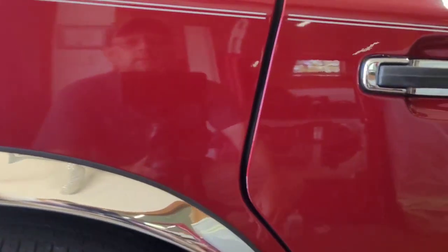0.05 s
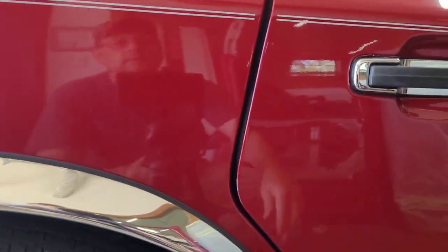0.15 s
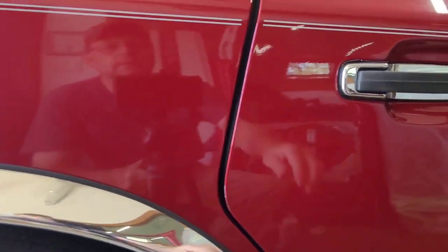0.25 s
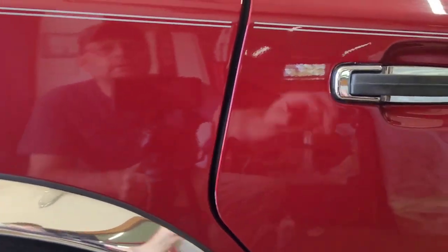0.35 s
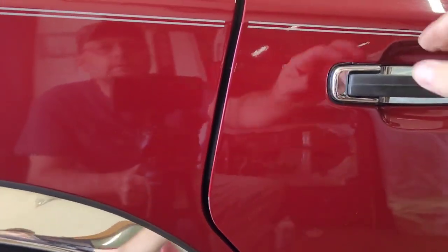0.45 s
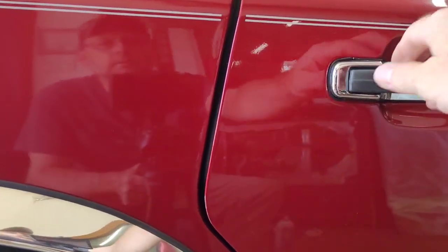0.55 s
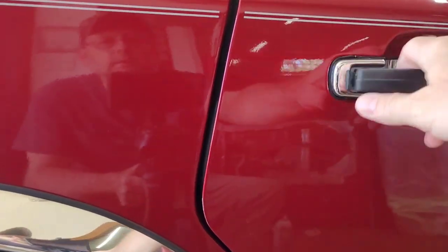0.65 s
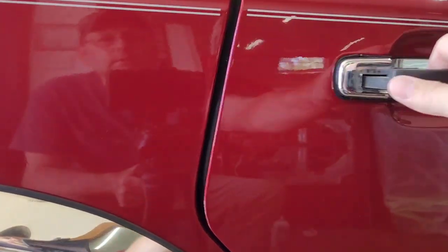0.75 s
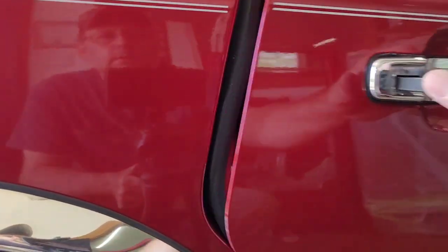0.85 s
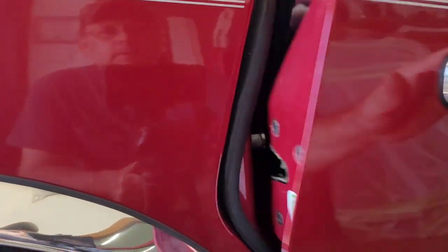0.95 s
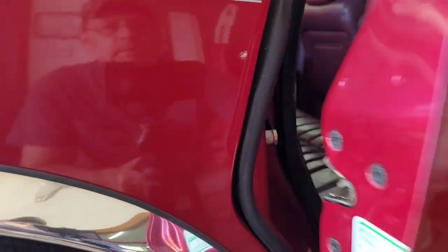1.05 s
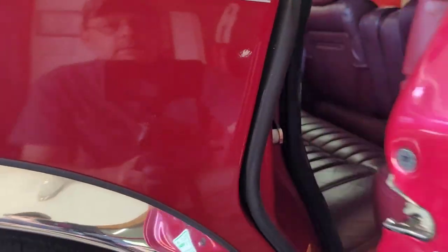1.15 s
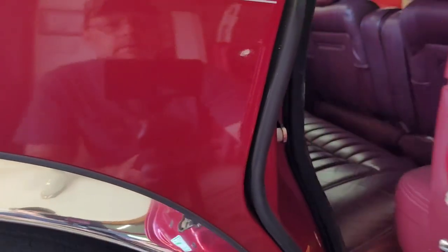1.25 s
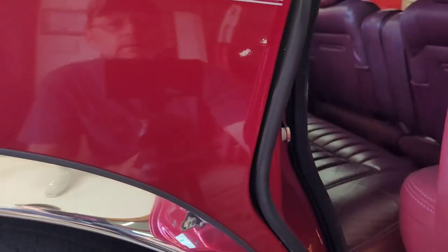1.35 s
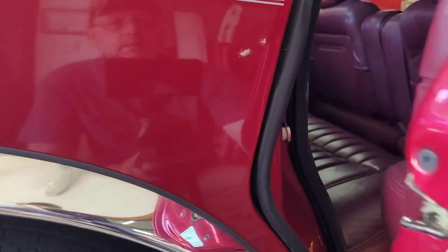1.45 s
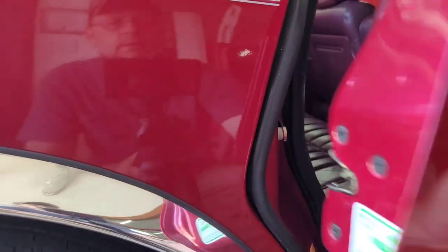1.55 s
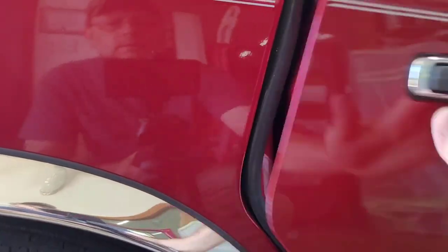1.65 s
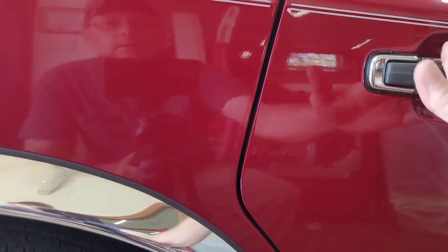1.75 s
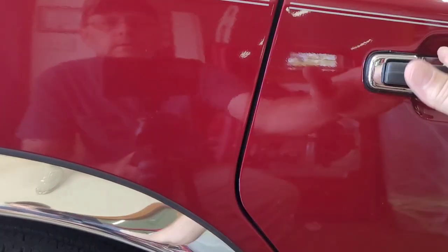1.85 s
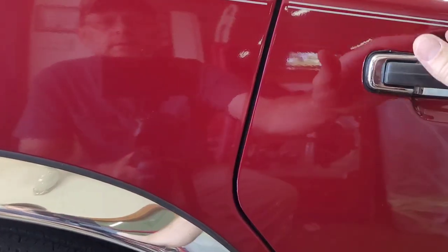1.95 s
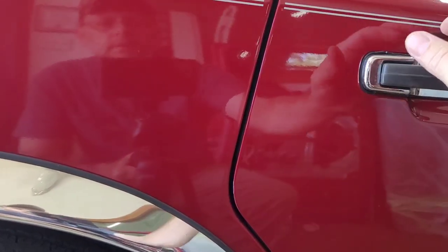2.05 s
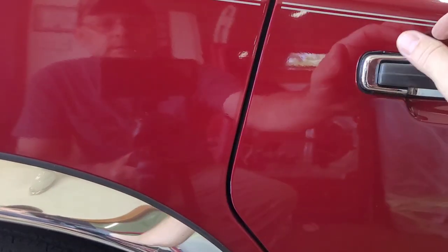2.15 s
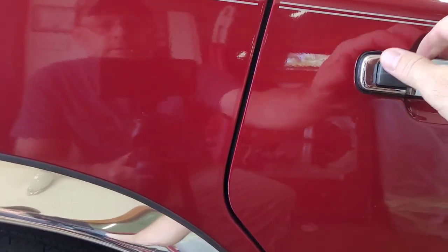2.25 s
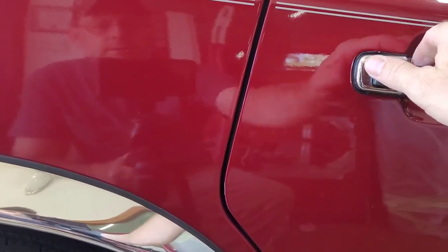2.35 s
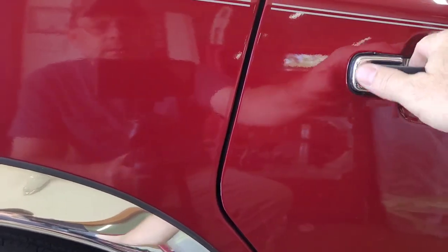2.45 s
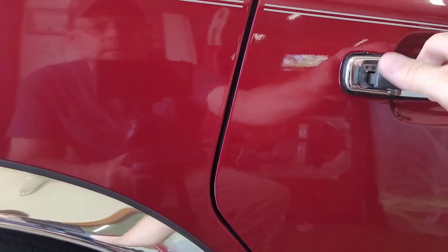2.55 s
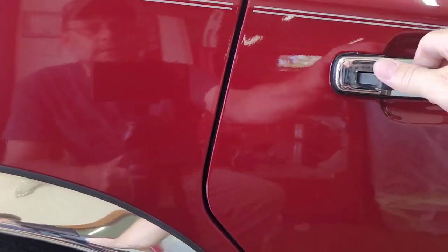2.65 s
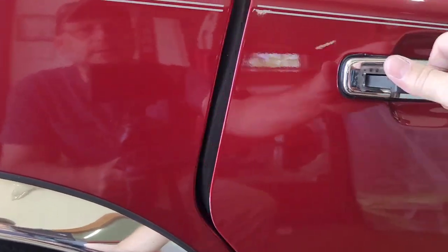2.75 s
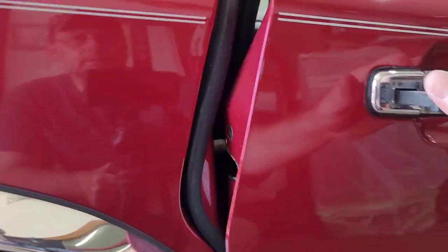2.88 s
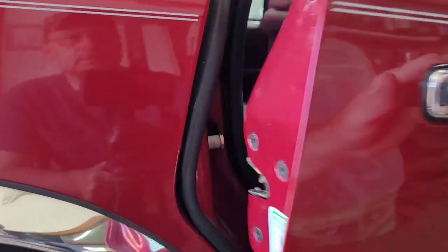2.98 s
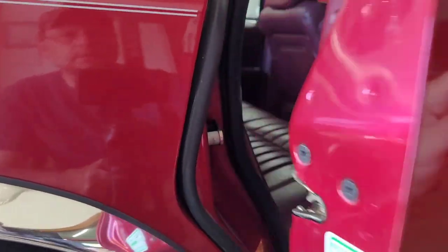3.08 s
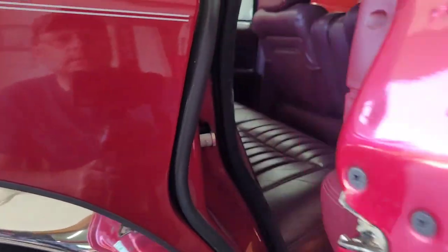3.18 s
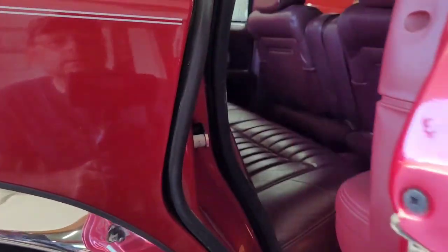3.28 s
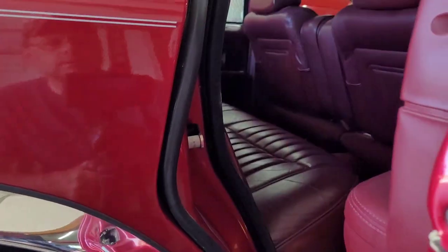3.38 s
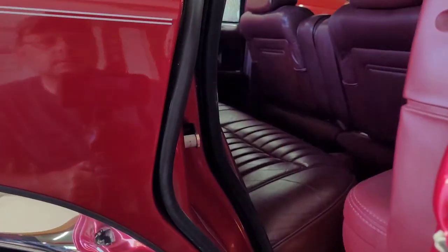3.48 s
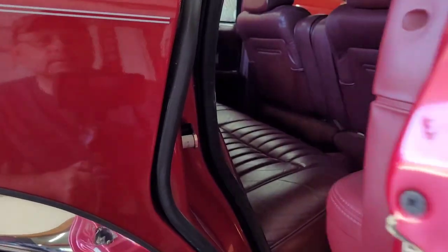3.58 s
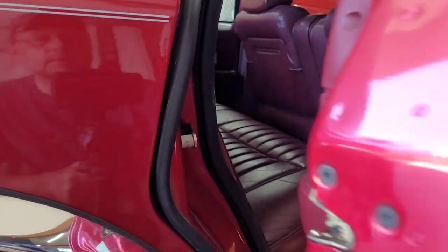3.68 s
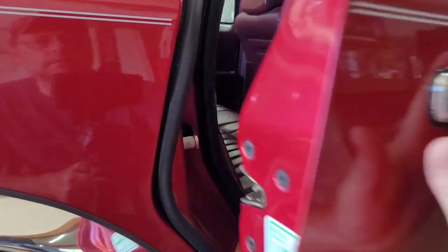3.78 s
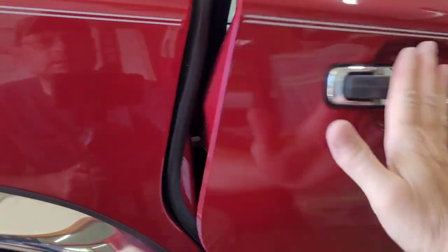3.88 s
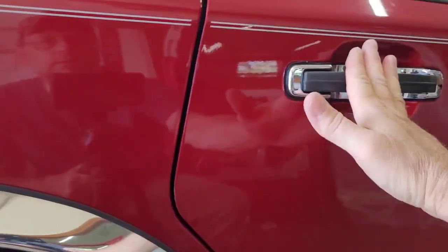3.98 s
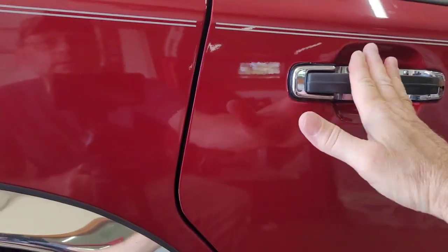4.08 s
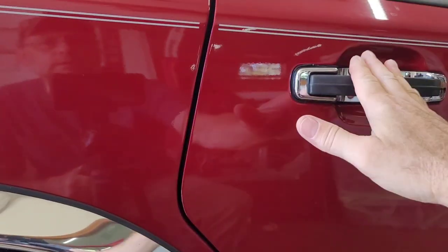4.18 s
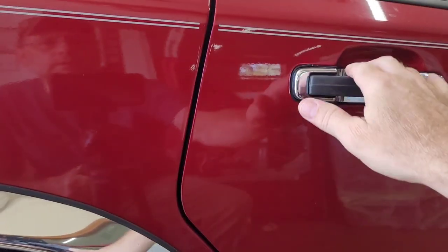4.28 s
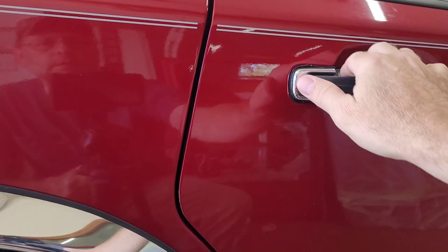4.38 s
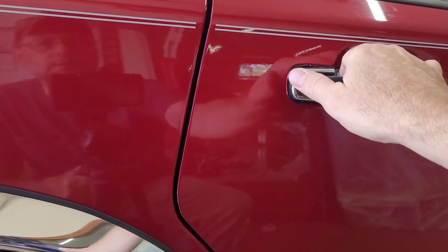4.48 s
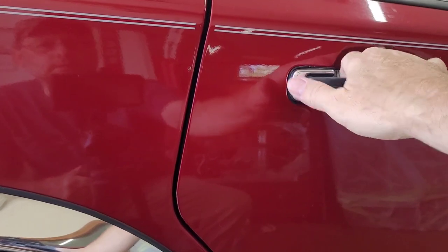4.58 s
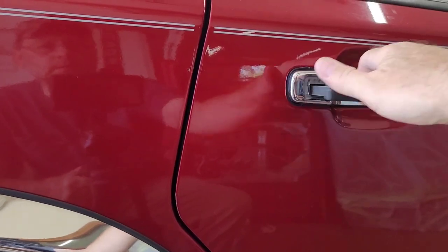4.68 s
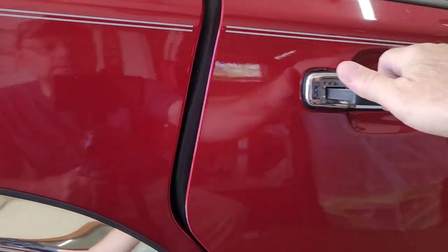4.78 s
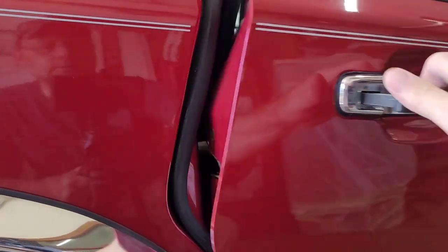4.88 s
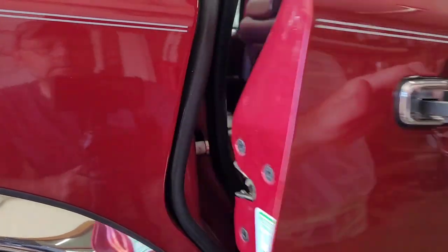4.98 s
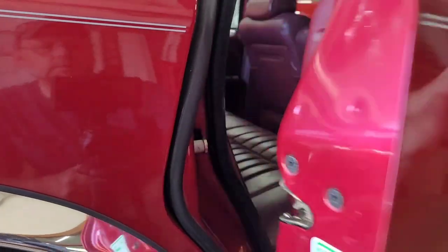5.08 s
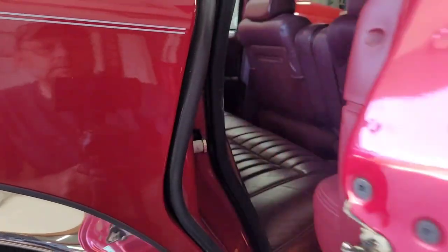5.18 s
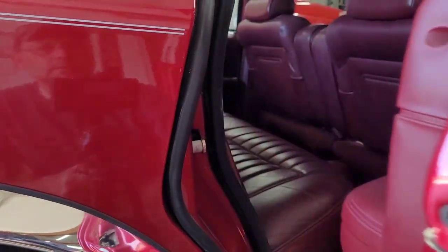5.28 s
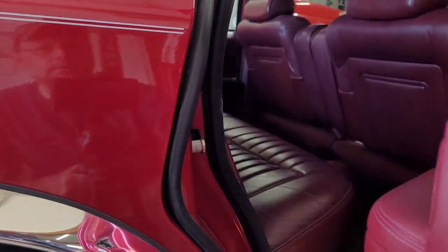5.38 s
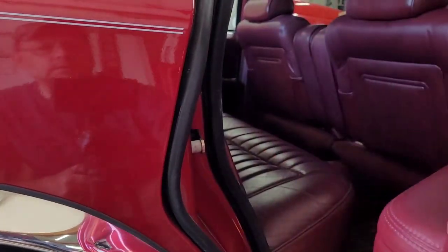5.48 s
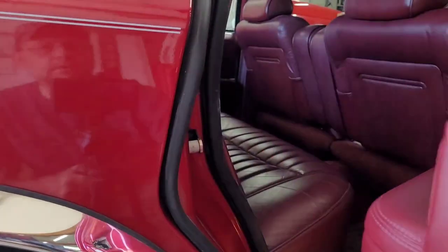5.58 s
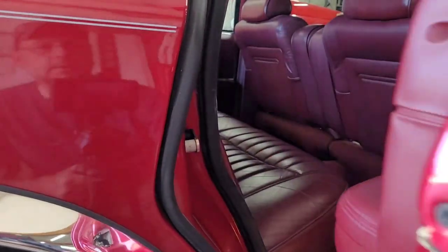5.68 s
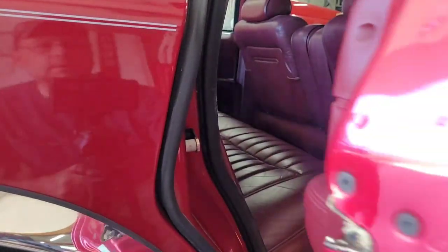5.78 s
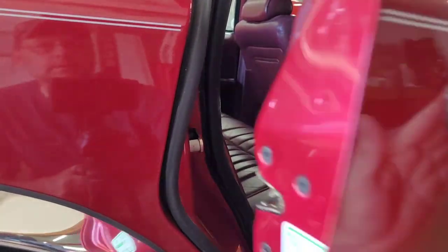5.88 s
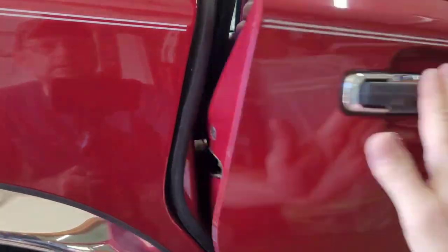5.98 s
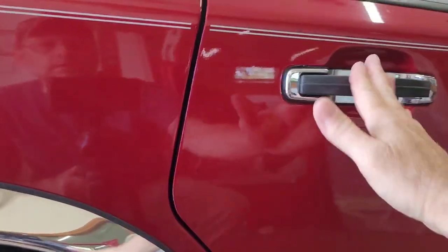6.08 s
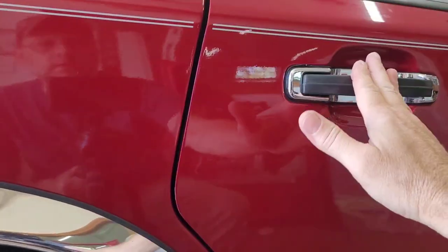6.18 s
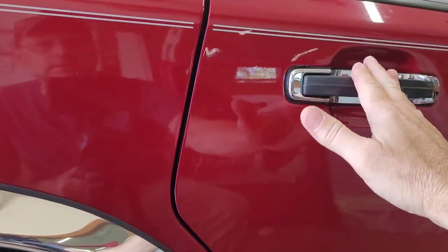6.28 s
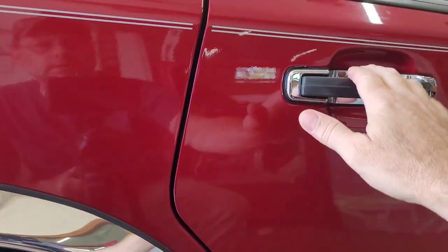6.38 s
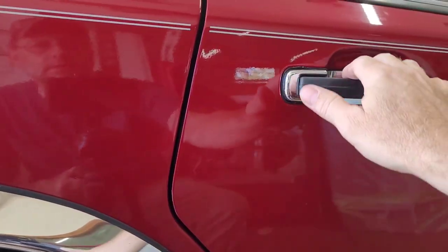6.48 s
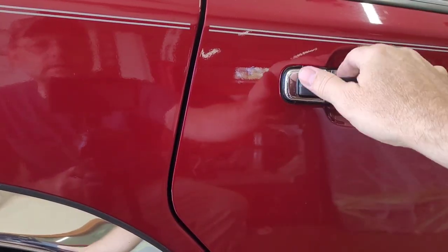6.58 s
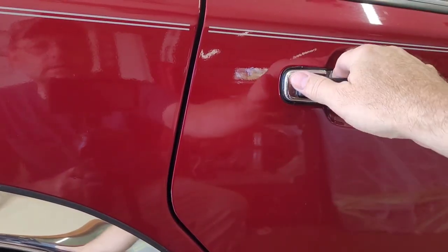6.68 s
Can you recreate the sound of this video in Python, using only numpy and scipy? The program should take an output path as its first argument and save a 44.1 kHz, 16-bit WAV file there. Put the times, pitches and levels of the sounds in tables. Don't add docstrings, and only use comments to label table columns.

```python
import sys
import numpy as np
from scipy import signal
from scipy.fft import rfft, irfft, next_fast_len
from scipy.io import wavfile
from scipy.ndimage import uniform_filter1d

SR = 44100
rng = np.random.default_rng(int(sys.argv[2]) if len(sys.argv) > 2 else 0)


def store_wav(level_fs):
    pcm = np.round(np.clip(np.atleast_2d(level_fs), -1, 1) * 32767)
    wavfile.write(sys.argv[1], SR, pcm.T.astype(np.int16))


def invert_db(level):
    return 10 ** (np.asarray(level, dtype=float) / 20)


N = 296953
LEAD_IN = 11025
CLICK_SIZE = SR // 6

# first_catch_s, first_catch_db, gap_to_full_catch_s, full_catch_db, thud_db
DOOR_SHUTS = [
    (-.18, -6.5, 0.019, -4.5, -2),
    (1.7387, -5, 0.015, -7.5, -9),
    (3.9936, -8.5, .0155, -6.5, -8),
    (6.111, -8.5, 0.016, -7, -8),
]
# spring_release_s, spring_db, gap_to_knock_s, knock_db, door_skin_db
HANDLE_SNAPS = [
    (1.0947, -12.5, 0.008, -4, -8),
    (3.1, -15.5, .0122, -5, -11.5),
    (5.1243, -17.5, .0108, -5.5, -13.5),
]
# start_s, link_db, spring_db, struck_rod_hz
HANDLE_CLICKS = [(0.248, -46.5, -51, 1390), (0.501, -54.5, -71, 2210), (0.718, -22.5, -52, 850),
                 (0.748, -28, -51, 1280), (0.781, -21.5, -38.5, 727), (0.793, -13, -26.5, 2060),
                 (0.809, -18, -21.5, 1330), (0.856, -30, -23.5, 705), (0.953, -52, -39.5, 972),
                 (1.066, -52.5, -49.5, 1000), (2.574, -27, -67, 834), (2.588, -29.5, -42.5, 845),
                 (2.626, -40.5, -63, 856), (2.709, -30.5, -43.5, 727), (2.770, -32, -57, 1300),
                 (2.802, -29, -23.5, 705), (3.054, -55.5, -68, 900), (3.080, -53, -50.5, 900),
                 (4.67, -25.5, -67.5, 821), (4.686, -31, -40.5, 727), (4.747, -42.5, -51.5, 900),
                 (4.7586, -18.5, -16.5, 705), (4.799, -28, -38.5, 716), (4.827, -25.5, -23.5, 1870)]
# center_s, peak_db, pitch_hz, length_cycles
SOFT_KNOCKS = [(.27, -56, 60.1, 0.76), (0.531, -63, 67.9, 2.1), (0.529, -64, 154.8, 6.),
               (.33, -62.5, 160, 6.), (1.381, -44.5, 52.47, 2.4), (1.49, -46.5, 80.9, 1.6),
               (2.35, -68, 55, 4.6), (2.502, -65, 55, 1.77), (2.713, -35, 150, 1.4),
               (2.752, -54.5, 4320, 61), (3.31, -45.5, 90, 1.4), (3.39, -47, 268, 4.1),
               (3.728, -60.5, 69.3, 1.9), (3.77, -61, 59.6, 2.1), (4.432, -56, 55.1, 4.8),
               (4.6, -63.5, 54.8, 3.4), (4.7477, -26, 133.5, 1.3), (5.43, -54, 517, 2.3),
               (3.375, -58, 516, 4.), (5.444, -44.5, 261, 3.9), (5.787, -56, 53.1, 1.61),
               (6.68, -67, 50, 3)]
# full_load_s, creak_db, held_s
HANDLE_LOADS = [
    (.722, -34.5, 0.049),
    (.794, -27.5, .016),
    (2.578, -40, 0.094),
    (2.712, -30.5, .06),
    (4.674, -40.5, 0.056),
    (4.762, -29, 0.027),
    (4.795, -34.5, 0.018),
]
# full_swing_s, rocking_db, held_s
DOOR_ROCKS = [(.756, -36, 0.036), (.9, -50, 0.013), (1.05, -59.5, .02), (2.62, -55, 0.052),
              (2.708, -36.5, 0.026), (2.795, -43, .012), (4.748, -39, 0.023), (4.838, -42.5, 0.017)]
# full_speed_s, level_db, held_s
SLEEVE_STROKES = [(.22, -71.5, 0.1), (.508, -83, 0.093), (.69, -77, .02), (3.5, -79.5, 0.13)]

# pitch_hz, peak_db, t60_s
LATCH_MODES = [(530, -9, .03), (760, -11, .03), (1180, .5, .04), (1850, .5, .038), (2480, -2, .03),
               (3570, -9, .03), (4900, -15, .03)]
# pitch_hz, peak_db, t60_s
CABIN_MODES = [(48.7, -18.5, 0.33), (59, -15.5, 0.26), (86.3, -13.5, 0.41)]
# pitch_hz, peak_db, t60_s
SHELL_MODES = [(110, 2, 0.08), (145.6, -8.5, 0.17), (199, -3.5, 0.1), (302, -12, 0.23), (310, -17, 0.069),
               (400.7, -20, 0.35), (560, -18, 0.15)]
# pitch_hz, peak_db, t60_s
SKIN_MODES = [(136, -9.5, 0.25), (168, -13, 0.24), (222, -9.5, 0.11), (274, -10, 0.28),
              (450.5, -13.5, 0.21), (610, -17, 0.06), (810, -11, .12)]
# pitch_hz, peak_db, t60_s
KNOCK_MODES = [(640, -6, .025), (900, -1, .018), (1250, -15, .02), (1620, -12, .03), (1900, -11, .035),
               (3900, -11, .035)]
# pitch_hz, peak_db, t60_s
LINK_MODES = [(543.5, 2, 0.041), (746, -4.5, .03), (820, -8, 0.014), (1050, -11, 0.21), (1300, -2.5, 0.018),
              (1564, -8.5, 0.13), (1840, -16.5, 0.025), (2470, -15, 0.015)]
# pitch_hz, peak_db, t60_s
SPRING_MODES = [(4300, -8, .015), (6300, -5, .02), (7100, -4, .03), (10300, -6, .015), (11200, -6, .015)]

# pitch_hz, level_db
TRIM_TONE = [(120, -29), (200, -5), (427, -10), (584, -9.5), (800, -17.5), (1680, -16.5), (2130, -17),
             (3390, -22.5), (4000, -19.5), (6960, -26), (8690, -36), (15100, -34.5), (16600, -47.5)]
# pitch_hz, level_db
HANDLE_PARTS_TONE = [(210, -32), (350, 4.5), (405, -5), (851, 0), (1320, -15), (2210, -11.5), (4420, -20.5),
                     (6940, -28.5), (8290, -39), (10900, -23.5), (13200, -40.5), (15300, -31.5),
                     (16600, -45.5)]
# pitch_hz, level_db
SPRING_CLICK_TONE = [(880, -32.5), (1500, -11), (1850, -3), (2660, -12.5), (2940, -10), (5550, -16.5),
                     (7060, -5.5), (8720, -21), (11100, -14.5), (15200, -30), (16600, -36)]
# pitch_hz, level_db
HANDLE_SPRING_TONE = [(710, -28.5), (1200, 1), (2590, 2), (4590, -9), (6890, 0.5), (8870, -11),
                      (13900, -6.5), (15200, -3), (16100, -6.5), (16600, -16)]
# pitch_hz, level_db
RUBBING_TONE = [(150, -27.5), (250, 2), (884, -16.5), (1530, -17.5), (2340, -20), (2890, -26.5),
                (3800, -21.5), (4540, -29), (7260, -36), (12000, -49), (15600, -84), (22000, -120)]
# pitch_hz, level_db
CLOTH_TONE = [(300, -19.5), (600, -4.5), (3120, -6.5), (5200, -15.5), (7000, -7.5), (8800, -27.5),
              (10800, -14.5), (13500, -25.5)]
# pitch_hz, level_db
QUIET_TONE = [(25, -12), (60, -3), (180, -14.5), (260, -4.5), (330, -11.5), (490, -9.5), (600, -22),
              (1500, -26), (2100, -11.5), (2800, -11), (3500, -24.5), (5200, -36.5), (6800, -24.5),
              (8300, -35.5)]
# pitch_hz, level_db
LAMP_HUM = [(242.2, -79), (360.7, -87), (479.1, -82)]

# pitch_hz, t60_s
ECHO_TIME = [(60, 0.66), (170, 0.47), (420, 0.43), (1100, 0.49), (2900, 0.51), (6000, 0.5), (11000, 0.52),
             (16000, .22)]
# pitch_hz, echo_db
ECHO_LEVEL = [(50, -8.5), (100, -8.5), (140, -12.5), (225, -7), (280, -18.5), (345, -10), (2500, -9),
              (15000, -16.5)]
# pitch_hz, likeness_0_to_1
STEREO_LIKENESS = [(60, 0.93), (250, 0.92), (600, 0.68), (1500, 0.23), (4000, 0.14), (9000, 0.19),
                   (15000, 0.1)]
# pitch_hz, left_over_right_db
STEREO_LEAN = [(60, -3), (180, -0.5), (550, -2.5), (1650, -1), (4970, -3), (15000, -1)]


def evened(x):
    return x / np.sqrt(np.mean(x ** 2) + 1e-20)


def read(points, hz):
    table_hz, value = np.transpose(points)
    return np.interp(np.log(hz + 1), np.log(table_hz + 1), value)


def add(mix, s, sound):
    part = mix[:, round(s * SR) + LEAD_IN:][:, :sound.shape[-1]]
    part += sound[..., :part.shape[1]]


def hiss(tone, size):
    hz = np.fft.rfftfreq(size, 1 / SR)
    noise = rfft(rng.standard_normal((2, size)))
    return evened(irfft(noise * invert_db(read(tone, hz)), size))


def long_hiss(tone, size):
    return hiss(tone, next_fast_len(size))[:, :size]


def ring(modes, rise, spread=0.01, size=SR // 2):
    t = np.arange(size) / SR
    detune = 1 + spread * rng.standard_normal(len(modes))
    tones = 0
    for (hz, db, t60), k in zip(modes, detune):
        tones = tones + invert_db(db - 60 * t / t60) * np.sin(2 * np.pi * hz * k * t)
    return tones * (1 - np.exp(-t / rise))


def burst(tone, rise, t60, lumps_db=3.5, size=SR // 2):
    t = np.arange(size) / SR
    lumps = evened(uniform_filter1d(rng.standard_normal(size), size=60))
    level_db = lumps_db * np.clip(lumps, -3, 1.6) - 60 * t / t60
    return hiss(tone, size) * invert_db(level_db) * (1 - np.exp(-t / rise))


def chatter(sound, span=0.00049):
    t = np.arange(530) / SR
    touching = rng.random(len(t)) < 1500 / SR
    hits = rng.standard_normal((2, len(t))) * touching * np.exp(-t / span)
    hits[:, 0] = 1.5
    spread = signal.fftconvolve(sound[None], hits, axes=1)[:, :len(sound)]
    return evened(spread) * np.sqrt(np.mean(sound ** 2))


def pump(hz, length, glide=.2, push_db=-40):
    t = np.arange(round(length * SR)) / SR
    turns = hz * t * (1 - glide / 2 + glide / 2 * t / length)
    swell = np.sin(np.pi * (t / length) ** 0.79) ** 0.51
    return (invert_db(push_db) - np.sin(2 * np.pi * turns)) * swell


def swells(rows, size, rise_db_per_s, fall_db_per_s):
    t = (np.arange(0, size, 32) - LEAD_IN) / SR
    power = 0
    for s, db, held in rows:
        before, after = np.maximum(s - t, 0), np.maximum(t - s - held, 0)
        power = power + invert_db(2 * (db - rise_db_per_s * before - fall_db_per_s * after))
    return np.interp(np.arange(size), np.arange(len(t)) * 32, np.sqrt(power))


def room_tone(size):
    t = np.arange(size) / SR
    drift = evened(uniform_filter1d(rng.standard_normal((2, size)), size=5000))
    hum = sum(invert_db(db - 1.57) * np.sin(2 * np.pi * hz * t) for hz, db in LAMP_HUM)
    quiet = invert_db(-73.77 + 1.2 * drift[1]) * hiss(QUIET_TONE, size)
    return quiet + hum * invert_db(0.69 * drift[0])


def garage():
    taps = np.zeros((2, SR))
    at = np.arange(260, SR - 20, 20) + rng.integers(0, 20, (2, (SR - 261) // 20))
    np.put_along_axis(taps, at, rng.choice([-1., 1.], at.shape), 1)
    hz, t, z = signal.stft(taps, SR, nperseg=512)
    t60 = read(ECHO_TIME, hz)[:, None]
    z = z * invert_db(-60 * t / t60) / np.sqrt(t60 * SR / 20 / np.log(1e6))
    tails = signal.istft(z, SR, nperseg=512)[1][:, :SR]
    level = invert_db(read(ECHO_LEVEL, np.fft.rfftfreq(SR, 1 / SR)))
    tails = irfft(rfft(tails) * level, SR)[:, :SR * 4 // 5]
    return tails * np.minimum(np.arange(tails.shape[1]) / 130.0, 1) ** 2


def small_sounds(mix):
    out, size = np.zeros_like(mix), mix.shape[1]
    t = np.arange(-SR // 8, SR // 8) / SR
    for s, db, hz, cycles in SOFT_KNOCKS:
        shape = np.exp(-(2 * hz * t / cycles) ** 2)
        add(out, s + t[0], invert_db(db) * np.sin(2 * np.pi * hz * t) * shape)
    speed = swells(SLEEVE_STROKES, size, rise_db_per_s=191.5, fall_db_per_s=253.5)
    return out + invert_db(11.0) * long_hiss(CLOTH_TONE, size) * speed


def handle_clicks(mix):
    out = np.zeros_like(mix)
    damped = invert_db(-400 * np.arange(CLICK_SIZE) / SR)
    for s, link_db, spring_db, hz in HANDLE_CLICKS:
        rod = ring([(hz, 0, .035)], .0007, size=CLICK_SIZE)
        add(out, s, invert_db(link_db - 4) * rod)

        link = chatter(ring(LINK_MODES, 0.0006, 0.064, size=CLICK_SIZE) * damped)
        rub = burst(RUBBING_TONE, .0004, .06, size=CLICK_SIZE)
        add(out, s, invert_db(link_db - 7) * (link + invert_db(-3) * rub))

        skin = ring(SKIN_MODES, 0.0037, 0.15, size=CLICK_SIZE) * damped
        add(out, s, invert_db(link_db - 10.5) * skin)

        fizz = burst(SPRING_CLICK_TONE, .0004, 0.03, lumps_db=2.0, size=CLICK_SIZE)
        spring = chatter(ring(SPRING_MODES, 0.00029, 0.027, size=CLICK_SIZE))
        add(out, s, invert_db(spring_db - 3.5) * (fizz + invert_db(-7.5) * spring))
    return out


def creaking(size):
    slips = (rng.random(size) < 400. / SR) * invert_db(5.2 * np.minimum(rng.exponential(1, size), 3))
    held = invert_db(-800 * np.arange(CLICK_SIZE) / SR)
    shell = ring(SHELL_MODES[1:], .002, .08, size=CLICK_SIZE) * held
    link = ring(LINK_MODES[:4], .001, size=CLICK_SIZE) * held
    body = (shell + invert_db(-6) * link)[:2000]
    creak = evened(signal.oaconvolve(slips * rng.choice([-1, 1], size), body))[:size]
    creak = creak + invert_db(-9) * long_hiss(RUBBING_TONE, size)
    return invert_db(-4.5) * creak * swells(HANDLE_LOADS, size, rise_db_per_s=698.5, fall_db_per_s=351)


def rocking(size):
    rumble = long_hiss([(20, -22), (40, -2), (60, 1), (95, -5.0), (160, -41.0), (16000, -88)], size)
    return invert_db(-2.0) * rumble * swells(DOOR_ROCKS, size, rise_db_per_s=749.5, fall_db_per_s=219.5)


def snaps(mix):
    out = np.zeros_like(mix)
    for s, spring_db, gap, knock_db, skin_db in HANDLE_SNAPS:
        home = s + gap
        add(out, s - .008, invert_db(spring_db - 14) * ring(SKIN_MODES[3:], 0.0027, .05))
        add(out, s + 0.0037, invert_db(spring_db - 7) * burst(SPRING_CLICK_TONE, 0.00082, .02))
        coil = burst(HANDLE_SPRING_TONE, 0.001, 0.18, 2.0)
        spring = chatter(ring(SPRING_MODES, 0.0009))
        add(out, s, invert_db(spring_db - 6.0) * (coil + invert_db(-10) * spring))

        add(out, home, invert_db(knock_db - 0.5) * chatter(ring(KNOCK_MODES, 0.00024, 0.05), 0.0019))
        add(out, home, invert_db(knock_db - 9.0) * burst(HANDLE_PARTS_TONE, .001, 0.15))
        add(out, home + .003, invert_db(skin_db + 3) * ring(SKIN_MODES, 0.013, 0.0029))
        add(out, home + 0.0024, invert_db(skin_db - 1.5) * pump(276., 0.042, glide=0))
        add(out, home, invert_db(skin_db - 3.5) * ring(CABIN_MODES[1:], 0.057, 0.034))
        add(out, home, invert_db(skin_db - 15) * ring(SHELL_MODES[:1], 0.022, 0.04))
    return signal.sosfilt(signal.butter(2, 60., "high", fs=SR, output="sos"), out)


def slams(mix):
    out = np.zeros_like(mix)
    for s, first_db, gap, full_db, thud_db in DOOR_SHUTS:
        shut = s + gap
        seal = hiss([(60, -5.5), (300, -4.0), (2500, -20), (4000, -37), (16000, -41.5)], 1800)
        add(out, s - .04, invert_db(thud_db - 28.0) * seal * np.linspace(0, 1, 1800) ** 3)

        latch = chatter(ring(LATCH_MODES, 0.004, 0.022), 0.00095)
        trim = burst(TRIM_TONE, 0.00076, 0.12)
        coil = burst(HANDLE_SPRING_TONE, 0.00066, 0.06)
        add(out, s, invert_db(first_db + 1.5) * (latch + invert_db(-9.0) * trim + invert_db(-17.5) * coil))

        trim = burst(TRIM_TONE, 0.00042, 0.077, 2.2)
        latch = chatter(ring(LATCH_MODES, 0.0033, 0.069))
        add(out, shut, invert_db(full_db - 2) * (trim + invert_db(-14.5) * latch))
        add(out, shut, invert_db(full_db - 9.0) * burst(TRIM_TONE, 0.0042, 0.28))

        add(out, shut + 0.0016, invert_db(thud_db + 0.5) * ring(SHELL_MODES, 0.0024))
        trapped_air = pump(53., .064, glide=0.44, push_db=-22)
        add(out, shut + 0.0009, invert_db(thud_db - 2.5) * trapped_air)
        add(out, shut + .03, invert_db(thud_db - 1) * ring(CABIN_MODES, 0.064, 0.036))
    return out


def ports(near, far):
    size = next_fast_len(near.shape[1] + SR // 4)
    hz = np.fft.rfftfreq(size, 1 / SR)
    same = np.clip(read(STEREO_LIKENESS, hz), 0, 1)
    a, b = rfft(near + far, size)
    delay_s = 6e-5
    lean = invert_db(read(STEREO_LEAN, hz) / 2) * np.exp(1j * np.pi * hz * delay_s)
    left = a * lean
    right = (same * a + np.sqrt(1 - same ** 2) * b) / lean
    return irfft(np.array([left, right]), size)


def scene():
    mix = np.zeros((2, N + LEAD_IN))
    size = mix.shape[1]
    handle = handle_clicks(mix) + creaking(size) + rocking(size)
    dry = small_sounds(mix) + handle + snaps(mix) + slams(mix)
    echo = signal.fftconvolve(dry, garage(), axes=1)[:, :size]
    return ports(dry, echo + room_tone(size))[:, LEAD_IN:LEAD_IN + N]


def band_limit(x):
    return signal.sosfilt(signal.butter(12, 16820, fs=SR, output="sos"), x)


def record(dry):
    ceiling = 1.05
    hz = np.fft.rfftfreq(2 * N, 1 / SR)
    low_cut = 1 / (1 + np.exp(np.clip((20. - hz) / .5, -50, 50)))
    high_cut = 1 / (1 + np.exp(np.clip((hz - 16300) / 60, -50, 50)))
    soft = ceiling * np.tanh(dry / ceiling)
    mix = irfft(rfft(soft, 2 * N) * low_cut * high_cut, 2 * N)[:, :N]
    return band_limit(mix)


dry = scene()
out = record(dry)
store_wav(out)
```